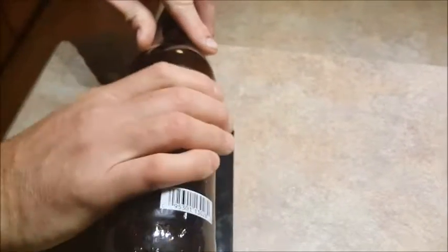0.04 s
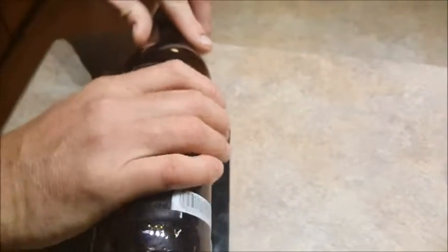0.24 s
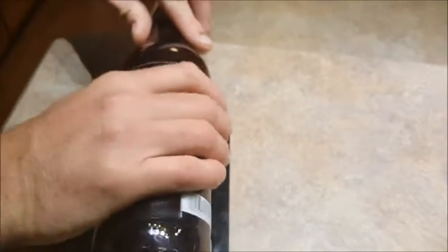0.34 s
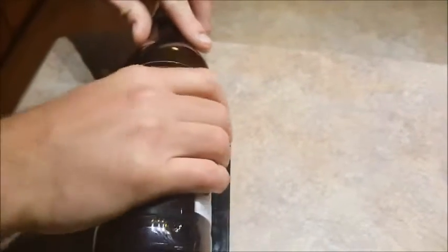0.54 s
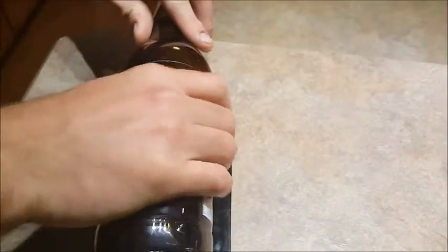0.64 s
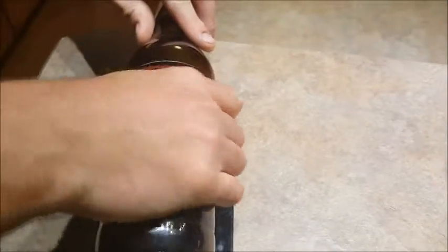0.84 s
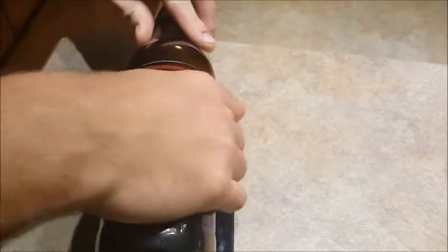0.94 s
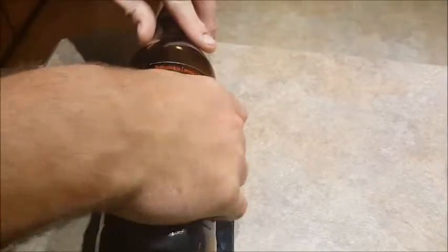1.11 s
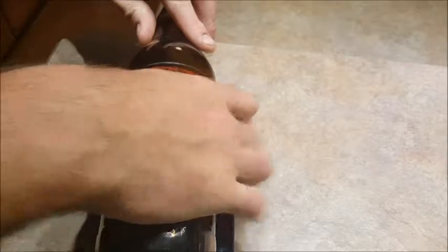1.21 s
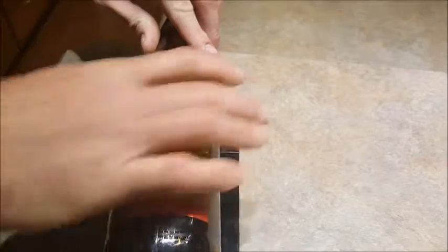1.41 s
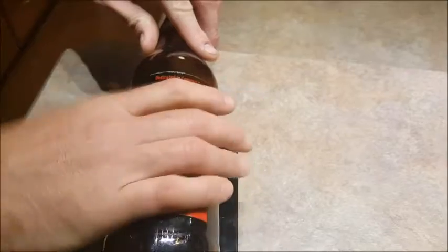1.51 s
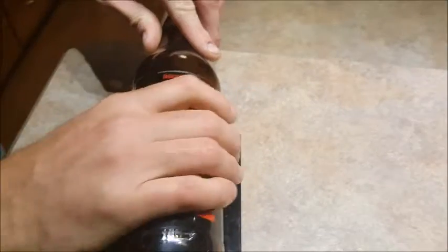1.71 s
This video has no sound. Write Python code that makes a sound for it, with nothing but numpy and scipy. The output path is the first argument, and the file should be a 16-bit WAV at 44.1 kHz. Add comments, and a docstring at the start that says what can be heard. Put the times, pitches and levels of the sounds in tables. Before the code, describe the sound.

A glass bottle scrapes against a cutter, starting with light ticks and becoming a gritty, faintly ringing grind at about 0.2 seconds. Sharp cracks of chipping glass come at 0.4 and 1.0 seconds. The scrape stutters to a stop around 1.2 seconds. Faint squeaks, dry ticks and soft handling bumps follow until 1.7 seconds, over a low electrical hum in a small, slightly echoing room.

```python
"""Kitchen counter in a small, live room with mains hum. A hand rolls a glass bottle against the cutter
of a scoring jig. The cutter catches in single slips, runs into a gritty scrape and stutters to a stop;
each slip crushes grains of glass and rings the bottle. Chips break out, twice loudly, and jolt bottle
and jig. Handling adds low bumps; faint squeaks and ticks follow as the hand lets go."""
import sys
import numpy as np
from scipy import signal
from scipy.fft import rfft, irfft, next_fast_len
from scipy.io import wavfile

SR = 44100
rng = np.random.default_rng(int(sys.argv[2]) if len(sys.argv) > 2 else 0)


def write(x):
    x = np.atleast_2d(x).T
    wavfile.write(sys.argv[1], SR, np.round(np.clip(x, -1, 1) * 32767).astype(np.int16))


N = 77175
TIME_S = np.arange(N) / SR

# mains hum and faint steady tones: f/Hz, level/dB
HUM_TONES = [(120, -46), (216, -56.5), (260, -60.5)]
# room air: f/Hz, level/dB
AIR_SPECTRUM = [(25, -23), (60, -25), (100, -5.5), (160, -2), (230, -1.5), (330, -7), (430, -15.5),
                (550, -8), (750, -19.5), (2000, -21.5), (4000, -38.5), (8000, -56.5), (16000, -45)]
# prominent single slips: t/s, level/dB
SINGLE_SLIPS = [(0.0542, -39.5), (0.0636, -39), (0.0704, -36.5), (0.0743, -42), (0.0798, -38.5),
                (0.149, -36.5), (0.1665, -35.5), (0.19, -32.5), (0.2149, -29.5), (0.227, -33),
                (0.2353, -36.5), (0.2402, -35), (0.252, -37), (0.399, -18), (0.4224, -23), (0.4253, -25.5),
                (0.4458, -26), (0.4943, -32), (0.503, -28), (0.52, -35), (0.5294, -34), (0.546, -34.5),
                (0.5611, -31), (0.8226, -31), (0.848, -22.5), (1.018, -27.5), (1.034, -24.5), (1.067, -34),
                (1.0864, -29), (1.0956, -26.5), (1.0987, -30), (1.1243, -24.5), (1.1409, -28.5),
                (1.1689, -30.5), (1.1782, -32.5), (1.1934, -30), (1.2015, -50), (1.2164, -37.5),
                (1.2861, -40.5), (1.292, -46.5), (1.3009, -39.5)]
# tick at slip onset: f/Hz, level/dB
CATCH_SPECTRUM = [(200, -6.5), (600, -10.5), (1200, -1.5), (2500, -10.5), (3500, 2), (5000, 2.5),
                  (8500, 1.5), (9500, -21), (15000, -19.5)]
# continuous scoring effort: t/s, level/dB
EFFORT_CURVE = [(0.205, -61), (0.245, -37), (0.3, -36), (0.39, -35), (0.45, -39), (0.505, -38),
                (0.55, -50.5), (0.585, -39.5), (0.64, -35.5), (0.69, -38.5), (0.735, -32.5), (0.78, -37),
                (0.82, -39), (0.87, -33.5), (0.985, -38), (1.02, -38), (1.06, -45.5), (1.115, -32),
                (1.135, -39), (1.155, -74.5)]
# crushing glass: f/Hz, level/dB
GRIT_SPECTRUM = [(100, -49), (350, -1), (700, -19), (1150, -8.5), (1400, -20.5), (1900, -1.5), (2600, 0.5),
                 (2930, -6.5), (3300, 8.5), (4330, -3.5), (4600, -10), (5100, -3.5), (5500, -1.5),
                 (7300, 4), (8750, -7.5), (9250, -15.5), (11000, -5.5), (12500, -11), (14800, -5),
                 (16000, -23)]
# bottle and cutter resonances: f/Hz, width/Hz, level/dB, left-right/dB
GLASS_MODES = [(2176, 38, -5, 9.5), (2246, 93, 5.5, 10.5), (2515, 49, 5, 8), (2750, 60, 1, 9),
               (3116, 63.3, 0.5, 16.5), (3342, 50, 7.5, -4), (3480, 60, 6.5, -5.5), (3860, 82, 6.5, -13),
               (4224, 74, 8.5, -3.5), (4410, 60, -8, -8), (4960, 65, -1, 12), (5370, 138, -3.5, 18.5),
               (5580, 82, 7, 13), (5875, 190, 7, -0.5), (6420, 132, -10.5, -9.5), (6800, 67, 2, -6.5),
               (7020, 89, -1.5, -11), (7370, 90, 0.5, 7.5), (7980, 160, -1.5, 14), (8250, 108, 5.5, 12),
               (8400, 69, -6.5, 10.5)]
# strength of the glass ring, swelling to mid-scrape, then easing: t/s, level/dB
RING_CURVE = [(0.08, -6), (0.3, -2), (0.7, 1), (1.15, -4)]
# rolling bottle: f/Hz, level/dB
ROLL_SPECTRUM = [(40, -9), (130, 1), (220, 4.5), (340, 1.5), (520, -18.5), (1200, -20), (4000, -35)]
# handling bumps: t/s, 1/e half-length/s, f/Hz, level/dB
HAND_BUMPS = [(0.347, 0.02, 225, -42), (0.442, .03, 64, -61), (0.495, 0.006, 262, -40),
              (0.543, 0.0047, 211.4, -39), (0.851, 0.0063, 379, -39), (1.348, 0.012, 260.7, -45),
              (1.594, 0.0078, 221.4, -40), (1.682, 0.017, 73, -51.5)]
# chips: t/s, knock/dB, splinter/dB, ring/dB, ring tilt/(dB/octave), place (0 fresh glass, 1 groove)
CHIPS = [(0.4, -17, -21, -15.5, -1, 0.01), (0.4044, -49.5, -25, -39, -3, 0.49),
         (0.8512, -34.5, -31, -35, -1, 1), (0.9918, -18, -10, -13.5, -1, 1),
         (0.9948, -33.5, -10, -38.5, -6.5, 1), (1.0004, -38, -13, -21.5, 5, 1),
         (1.1227, -34.5, -46, -46, -1, 1)]
# splintering: f/Hz, level/dB
SPLINTER_SPECTRUM = [(200, -9), (800, -3), (1400, 6), (2200, 14), (3600, 7.5), (5500, 11.5), (8400, 10.5),
                     (9500, -12), (13000, 0), (16000, -34.5)]
# jig on the counter: f/Hz, level/dB, t60/s
JIG_MODES = [(222.5, -34.5, 0.039), (353.5, -6.5, 0.031), (760, -6, 0.015), (1025, -10, .04),
             (1166, -2.5, .025)]
# struck bottle: f/Hz, t60/s, level on fresh glass/dB, level in groove/dB
BOTTLE_MODES = [(1530, 0.023, -13, -6.5), (1690, 0.028, -0.5, -4), (2042, 0.035, 2, -21),
                (2204, 0.036, -5.5, -1), (2378, 0.043, -6.5, -10), (2530, 0.035, -5.5, -14),
                (3495, 0.017, -21.5, -2.5), (3734, 0.022, -6, -4), (4200, 0.034, -22.5, -3),
                (5370, .016, -22.5, 0.5), (5530, 0.014, -20, -25)]
# cutter on the groove edge: f/Hz, width/Hz, level/dB
GROOVE_MODES = [(3513, 130, 16), (4220, 87, 13.5), (6030, 136, -1.5)]
# glass squeaks: t/s, 1/e half-length/s, f/Hz, level/dB
GLASS_SQUEAKS = [(1.338, 0.0046, 2215, -46), (1.624, 0.012, 2540, -54), (1.63, 0.006, 4320, -51),
                 (1.626, 0.009, 6220, -57)]
# dry ticks: t/s, level/dB, low-pass f/Hz, left-right/dB
DRY_TICKS = [(1.374, -16, 677, -26.5), (1.464, -18, 695, -29), (1.68, -33, 9300, 31.5)]
# dry tick colour: f/Hz, level/dB
TICK_SPECTRUM = [(60, -7), (300, 5), (1500, -1.5), (7000, -10.5), (10000, -13), (16000, -2.5)]
# reverberation: f/Hz, t60/s, level/dB
ROOM_BANDS = [(147, 0.83, -6.5), (500, 0.19, -4), (1190, 0.67, -11.5), (2270, 0.35, -7.5),
              (4580, 0.46, -17), (7950, 0.67, -18), (15000, 0.36, -11)]


def from_db(db):
    """Decibels to gain."""
    return 10 ** (np.asarray(db) / 20)


def unit_rms(x):
    """Scale to rms 1."""
    return x / np.sqrt(np.mean(x ** 2) + 1e-20)


def pan(db):
    """Stereo gains for a left-right level difference."""
    return from_db(np.array([[db / 2], [-db / 2]]))


def stereo(mid, side, side_db):
    """Mid and side to left and right, rms 1."""
    return unit_rms(mid + from_db(side_db) * side * np.array([[1], [-1]]))


def gain_curve(points):
    """Gain per sample from t/s, level/dB points."""
    return from_db(np.interp(TIME_S, *np.transpose(points)))


def at_hz(points, hz, column=1):
    """Interpolate a table column over log frequency."""
    table = np.array(points)
    return np.interp(np.log(hz + 1e-9), np.log(table[:, 0]), table[:, column])


def colour(x, spectrum):
    """Minimum-phase filter, unit power gain."""
    size = 2 * next_fast_len(N)
    hz = np.arange(size // 2 + 1) * SR / size
    gain = unit_rms(from_db(at_hz(spectrum, hz)))
    cepstrum = irfft(np.log(gain))
    cepstrum[1:size // 2] *= 2
    cepstrum[size // 2 + 1:] = 0
    return irfft(rfft(x, size) * np.exp(rfft(cepstrum)))[..., :N]


def butter(x, order, hz, kind):
    """Butterworth filter."""
    return signal.sosfilt(signal.butter(order, hz, kind, fs=SR, output="sos"), x)


def resonate(x, hz, width_hz):
    """Two-pole resonance, peak gain 1."""
    radius = np.exp(-np.pi * width_hz / SR)
    feedback = [1, -2 * radius * np.cos(2 * np.pi * hz / SR), radius ** 2]
    return signal.lfilter(np.array([1, 0, -1]) * (1 - radius ** 2) / 2, feedback, x + 1e-18)


def strike(start_s, modes, neighbour_gain=1):
    """Struck modes; negative neighbour_gain swings adjacent ones in antiphase."""
    age_s = np.maximum(TIME_S - start_s, 0)
    return sum(neighbour_gain ** k * from_db(db - 60 * age_s / t60_s) * np.sin(2 * np.pi * hz * age_s)
               for k, (hz, db, t60_s) in enumerate(modes))


def bursts(times_s, levels_db, rise_s=0.00013, fall_s=0.0021):
    """Envelope of short bursts, summed in power."""
    age_s = np.arange(SR // 20) / SR
    shape = (1 - np.exp(-age_s / rise_s)) * np.exp(-age_s / fall_s)
    onsets = np.zeros(N)
    np.add.at(onsets, np.clip((times_s * SR).astype(int), 0, N - 1), from_db(levels_db) ** 2)
    power = signal.fftconvolve(onsets, (shape / shape.max()) ** 2)[:N]
    return np.sqrt(np.maximum(power, 0))


def sine(hz):
    """Random-phase sine, rms 1."""
    return np.sqrt(2) * np.sin(2 * np.pi * (hz * TIME_S + rng.random()))


def noise(spectrum):
    """Coloured noise, partly alike left and right."""
    return colour(stereo(*rng.standard_normal((2, N)), side_db=-7.5), spectrum)


def hum():
    """Mains hum with two faint steady tones."""
    return sum(from_db(db) * sine(hz) for hz, db in HUM_TONES)


def air():
    """Steady low room noise."""
    return from_db(-50.5) * noise(AIR_SPECTRUM)


def grains(rate_per_s=20000):
    """Dense microscopic fractures: impulses of random sign."""
    mid, side = np.sign(rng.standard_normal((2, N))) * (rng.random((2, N)) < rate_per_s / SR)
    return stereo(mid, side, side_db=-2)


def catches():
    """Crisp tick as each single slip starts, before the glass rings."""
    envelope = bursts(*np.transpose(SINGLE_SLIPS), fall_s=0.0011)
    return from_db(-0.5) * colour(grains() * envelope, CATCH_SPECTRUM)


def glass_ring(force, top_hz=8710):
    """Bottle and cutter resonate, each mode panned on its own."""
    ring = 2 * sum(from_db(db) * pan(pan_db) * resonate(force, hz, width_hz)
                   for hz, width_hz, db, pan_db in GLASS_MODES)
    return butter(ring, 8, top_hz, "low")


def stick_slip(effort, rate_per_s=240, log_jitter=0.47, spread_db=1.5, steady_db=-4.5):
    """Bite envelope: rapid uneven slips, steady grind and single slips."""
    gap_draws, level_draws = rng.standard_normal((600, 2)).T
    times_s = np.cumsum(np.exp(log_jitter * gap_draws)) / rate_per_s
    inside = times_s < TIME_S[-1]
    slips = unit_rms(bursts(times_s[inside], spread_db * level_draws[inside]))
    grind = effort * unit_rms(np.hypot(slips, from_db(steady_db)))
    return np.hypot(grind, bursts(*np.transpose(SINGLE_SLIPS)))


def scrape(bite):
    """The cutter crushes grains and rings the glass."""
    grit = from_db(-2.5) * colour(grains() * bite, GRIT_SPECTRUM)
    return grit + glass_ring(grains() * bite * gain_curve(RING_CURVE))


def rumble(effort):
    """The rolling bottle rumbles in step with the effort."""
    return from_db(-16.5) * effort * noise(ROLL_SPECTRUM)


def bumps():
    """Low swells of jig and counter under the hand."""
    return sum(from_db(db) * np.exp(-((TIME_S - peak_s) / half_s) ** 2) * sine(hz)
               for peak_s, half_s, hz, db in HAND_BUMPS)


def cracks(snap_db=6, snap_delay_s=0.0006, tilt_pivot_hz=2000):
    """Chips snap out in bright bursts; the jig knocks, the bottle rings according to the place."""
    times_s, _, splinter_db, *_ = np.transpose(CHIPS)
    force = grains() * bursts(times_s, splinter_db, rise_s=0.000091)
    force[:, ((times_s + snap_delay_s) * SR).astype(int)] += from_db(splinter_db + snap_db)
    out = colour(force, SPLINTER_SPECTRUM) + from_db(-12.5) * glass_ring(force)
    for start_s, knock_db, _, ring_db, db_per_octave, place in CHIPS:
        modes = []
        for hz, t60_s, fresh_db, groove_db in BOTTLE_MODES:
            tilt_db = db_per_octave * np.log2(hz / tilt_pivot_hz)
            modes.append((hz, np.interp(place, [0, 1], [fresh_db, groove_db]) + tilt_db, t60_s))
        out += from_db(knock_db) * pan(db=3) * strike(start_s, JIG_MODES)
        out += from_db(ring_db) * pan(db=8) * strike(start_s, modes, neighbour_gain=-1.002)
    return butter(out, order=2, hz=110, kind="high")


def groove_chirp(bite, start_s=0.63, full_s=1):
    """Once the groove is cut, the cutter chirps on its edge."""
    force = grains() * bite * np.interp(TIME_S, [start_s, full_s], [0, 1])
    return sum(from_db(db) * resonate(force, hz, width_hz) for hz, width_hz, db in GROOVE_MODES)


def squeaks(width_hz=77, rasp_db=-6.5):
    """The glass squeaks as the hand lets go: brief, narrow, raspy tones."""
    out = 0
    for peak_s, half_s, hz, db in GLASS_SQUEAKS:
        band = resonate(rng.standard_normal(N), hz, width_hz)
        tone = np.sqrt(2) * np.cos(np.angle(signal.hilbert(band)))
        rasp = from_db(rasp_db) * colour(grains(), GRIT_SPECTRUM)
        swell = np.exp(-((TIME_S - peak_s) / half_s) ** 2)
        out += from_db(db) * swell * (tone + rasp)
    return out


def ticks():
    """Tiny dry clicks, each close on one side."""
    out = 0
    for start_s, db, corner_hz, pan_db in DRY_TICKS:
        click = signal.unit_impulse(N, int(start_s * SR)) + 1e-18
        pole = np.exp(-2 * np.pi * corner_hz / SR)
        out += from_db(db) * pan(pan_db) * signal.lfilter([1 - pole], [1, -pole], click)
    return colour(out, TICK_SPECTRUM)


def counter_echo(x, delays_s=(0.0011, 0.0017)):
    """One countertop reflection, with its own path to each side."""
    delayed = [np.roll(side, round(delay_s * SR)) for side, delay_s in zip(x, delays_s)]
    return from_db(-18.5) * np.array(delayed)


def room(x, delay_s=0.0086, build_s=0.002):
    """Diffuse tail: builds after the first wall, decays per band."""
    age_s = np.maximum(TIME_S - delay_s, 0)
    edges_hz = np.geomspace(70, 17000, 13)
    tail = 0
    for low_hz, high_hz in zip(edges_hz, edges_hz[1:]):
        hz = np.sqrt(low_hz * high_hz)
        t60_s, db = at_hz(ROOM_BANDS, hz), at_hz(ROOM_BANDS, hz, column=2)
        shape = (1 - np.exp(-age_s / build_s)) * from_db(-60 * age_s / t60_s)
        band = butter(rng.standard_normal((2, N)), 2, [low_hz, high_hz], "band")
        tail += from_db(db) * band * shape / np.linalg.norm(shape)
    return signal.fftconvolve(x, tail, axes=1)[:, :N]


def scene(right_lag_s=0.00006):
    """Bottle slightly left, in a live room."""
    effort = gain_curve(EFFORT_CURVE)
    bite = stick_slip(effort)
    cutting = groove_chirp(bite) + scrape(bite) + catches()
    left, right = cutting + counter_echo(cutting) + cracks() + squeaks()
    direct = np.array([left, np.roll(right, round(right_lag_s * SR))])
    return direct + room(direct) + ticks() + bumps() + hum() + air() + rumble(effort)


def record(dry, ceiling=1.2, cutoff_hz=15900):
    """Soft clip, then steep low-pass."""
    rounded = ceiling * np.tanh(dry / ceiling)
    return signal.sosfilt(signal.ellip(10, 0.1, 80, cutoff_hz, fs=SR, output="sos"), rounded)


dry = scene()
out = record(dry)
write(out)
```